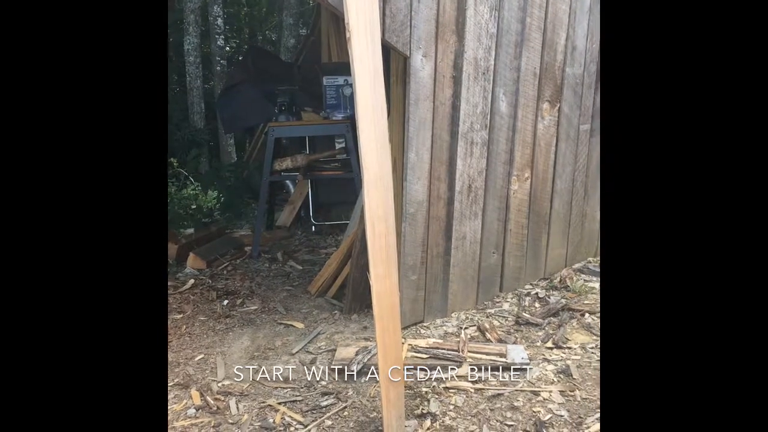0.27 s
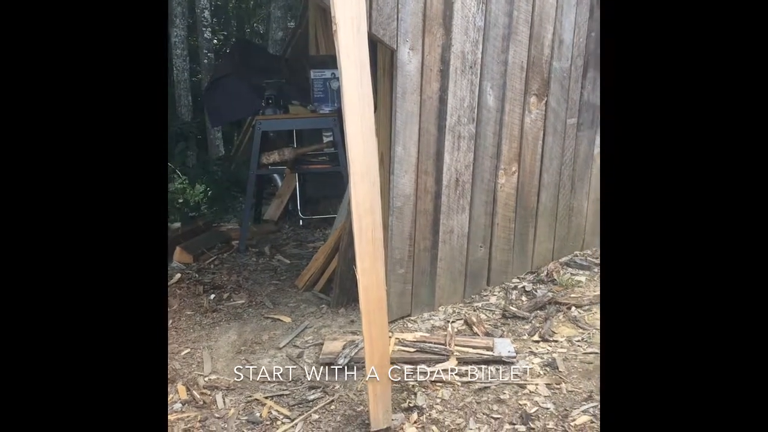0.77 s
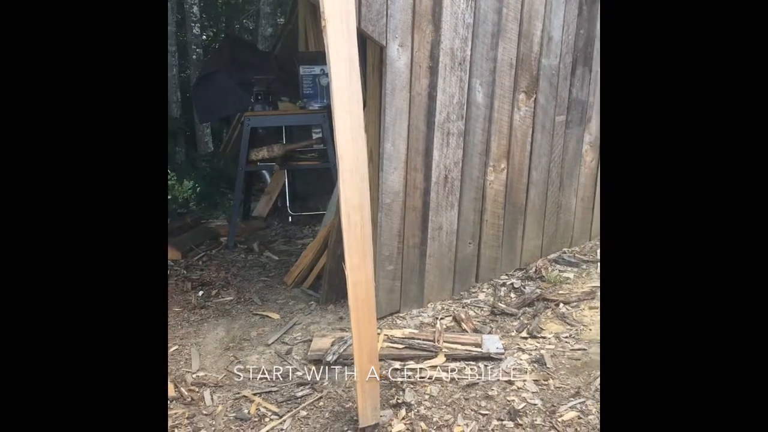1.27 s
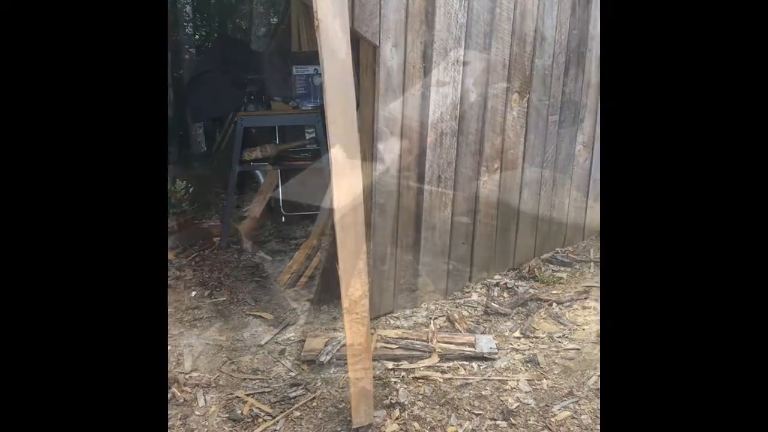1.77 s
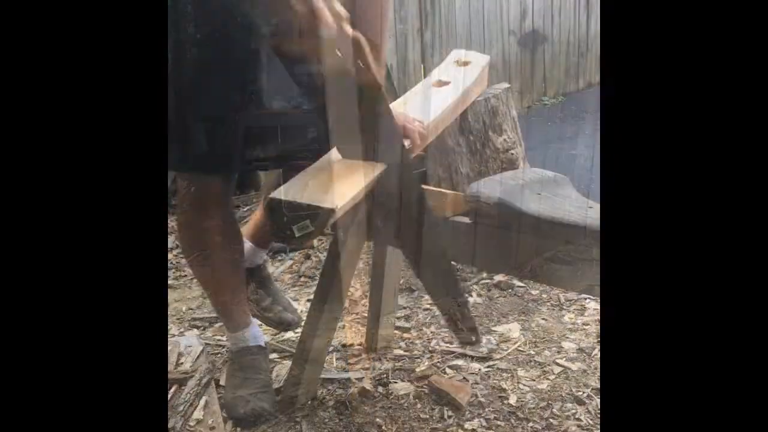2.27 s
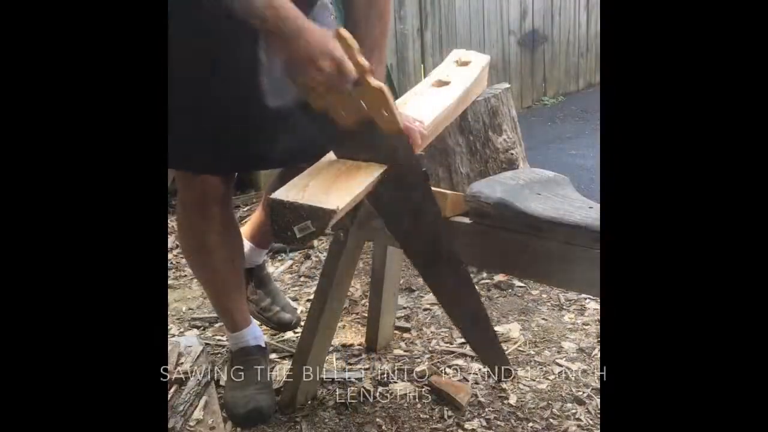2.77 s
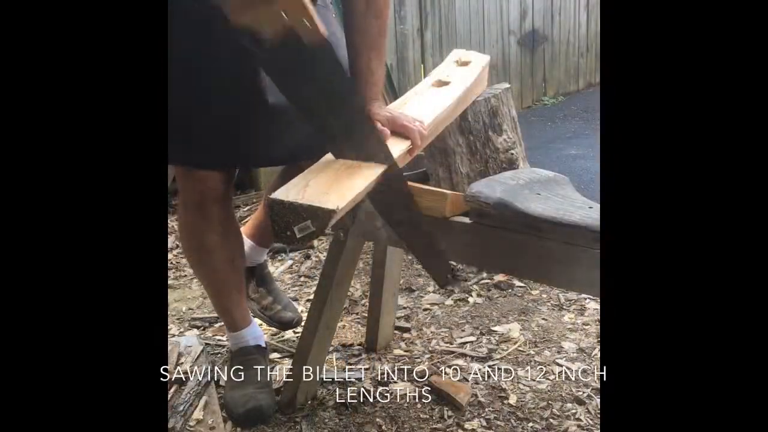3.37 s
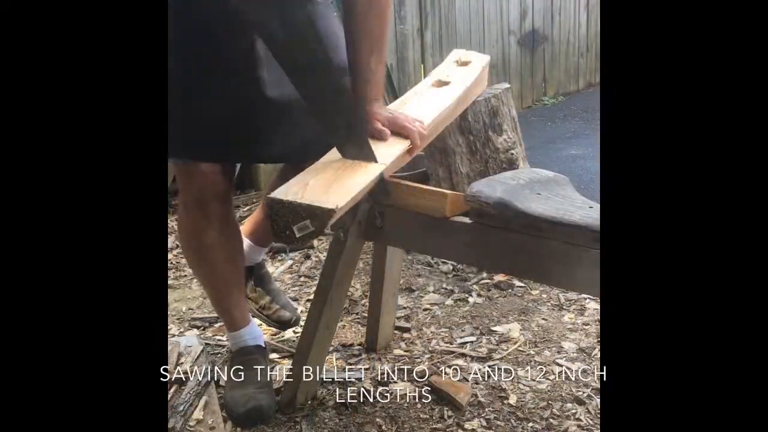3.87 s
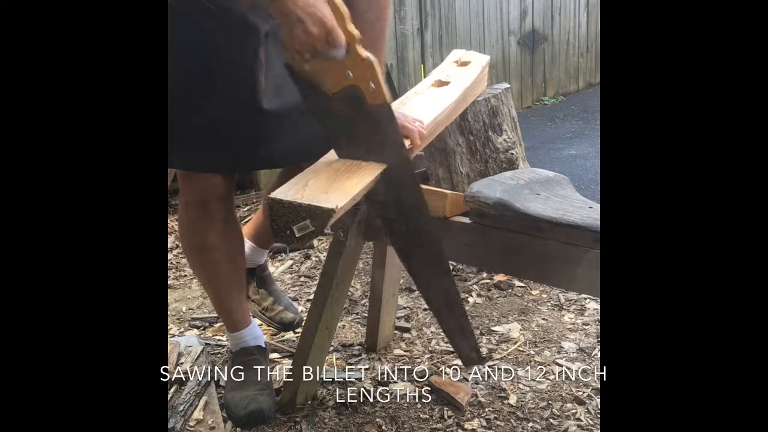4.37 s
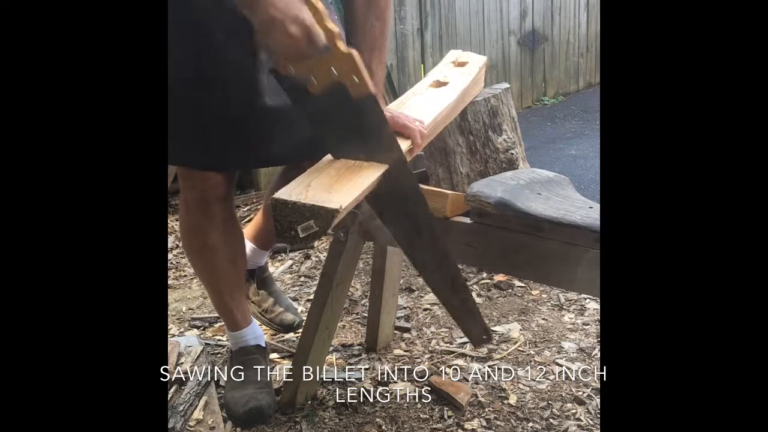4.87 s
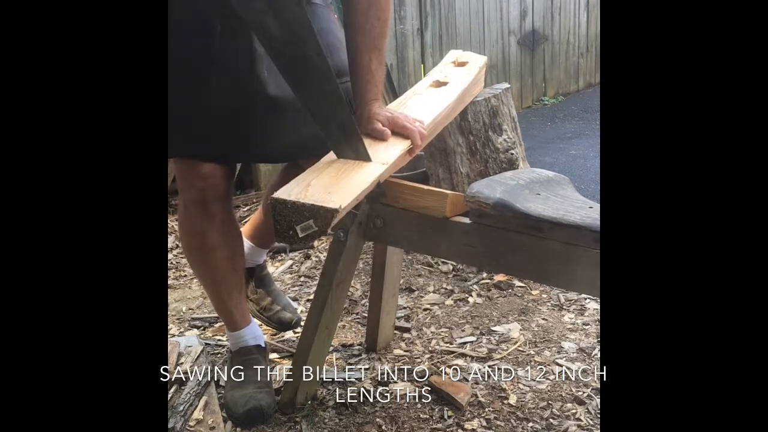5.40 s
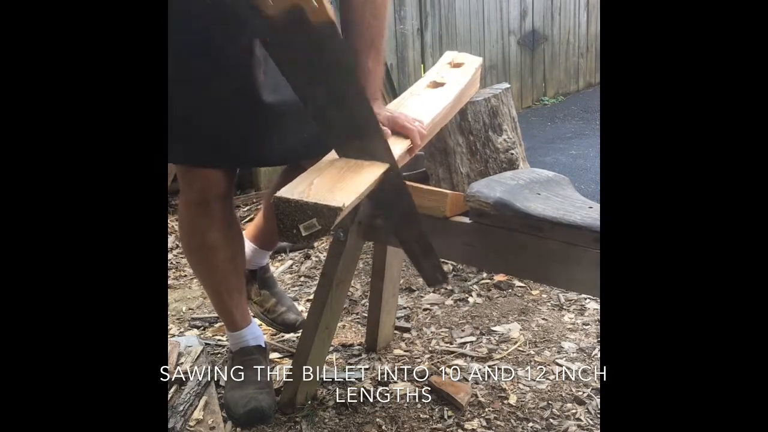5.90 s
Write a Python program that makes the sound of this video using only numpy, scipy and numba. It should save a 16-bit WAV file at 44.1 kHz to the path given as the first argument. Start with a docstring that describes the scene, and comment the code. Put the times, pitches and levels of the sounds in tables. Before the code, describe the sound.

From 0 to 1.4 seconds there is quiet open air with a thin, very high insect trill in fast groups of three, a fainter lower trill, and a few short chips. At about 1.4 a saw blade skims faintly over wood with a small squeak at 1.6. From 1.9 it cuts in earnest, push and pull alternating about every 0.35 seconds, while the insects fade out by 2.6. Each stroke is a grainy, resonant woody rasp under bright steel hiss; pulls often begin with a sharp skid and a falling whoop. Short woody judders catch around 2.7, 3.5, 4.2, 4.85 and 5.6, with high squeaks near 3.0 and 3.9. The blade rings briefly around 2.2, 3.6 and 5.0. Low soft bumps of the sawhorse accompany the strokes. Sawing is strongest around 3.3 to 4.3 and continues to the end at about 6, close, dry and centred.

```python
"""Outdoors by a wooden fence: insects trill and fade as a handsaw starts to crosscut a cedar billet on a sawhorse.
Noisy tooth snaps and tearing fibres drive the resonances of billet, sawhorse and steel, push and pull in turn.
Where the teeth catch, wavering tones judder and noise bands squeak; between some strokes the blade rings on.
Decaying noise makes the faint tail off fence and trees, shaped noise the air.
One close microphone, the same in both channels."""
import sys
import numpy as np
from scipy import signal
from scipy.fft import rfft, irfft
from scipy.io import wavfile
from scipy.ndimage import uniform_filter1d
from numba import njit

SR = 44100
rng = np.random.default_rng(int(sys.argv[2]) if len(sys.argv) > 2 else 0)


def waveform_to_disk(signal):
    """Save audio, clipped to [-1, 1], as 16-bit WAV at the path in sys.argv[1]."""
    frames = np.transpose(np.atleast_2d(signal))
    scaled = np.clip(frames, -1, 1) * 32767
    samples = np.round(scaled).astype(np.int16)
    wavfile.write(sys.argv[1], SR, samples)


N = 270774
T = np.arange(N) / SR

# Saw strokes, push and pull in turn. Each row: start, length, attack and release in seconds,
# basic level of the teeth's hiss in dB, basic level of the wood in dB.
STROKES = [(1.398, 0.345, 0.23, 0.13, -39.5, -58), (1.599, 0.32, 0.085, 0.056, -50.5, -44),
           (1.907, 0.32, 0.115, 0.094, -33, -33.5), (2.245, 0.38, 0.055, 0.16, -34.0, -30),
           (2.611, 0.43, 0.1, 0.19, -27.0, -29.5), (2.945, 0.39, 0.058, 0.15, -32.0, -30),
           (3.319, 0.34, 0.12, 0.093, -26, -26), (3.672, 0.35, 0.037, 0.081, -32.0, -28.5),
           (4.022, 0.303, 0.16, 0.056, -24, -24.0), (4.352, 0.37, 0.042, 0.159, -32.5, -29),
           (4.701, 0.35, 0.13, 0.075, -28.5, -27.5), (5.091, 0.359, 0.055, 0.13, -33.0, -29.5),
           (5.435, 0.33, 0.13, 0.081, -27.5, -27.5), (5.82, 0.36, 0.033, 0.18, -32.5, -27.5)]
# Bending modes of the blade. Each row: frequency in Hz, relative level in dB, 60 dB decay time in seconds.
BLADE = [(353.7, 8.5, 0.95), (489, 10.5, 0.6), (602, 6, 0.76), (860, 3, 0.57), (1030, 9.5, 0.26),
         (1140, 3.5, 0.69), (1180, -5, 0.48)]
# Thud of the sawhorse. Each row: frequency in Hz, relative level in dB.
SAWHORSE = [(25, -44), (65, 0.5), (110, -8), (150, 3), (180, 4), (205, 7), (240, 2), (290, -6.5),
            (500, -38)]


def undb(db):
    """Decibels to gain."""
    return 10 ** (np.asarray(db) / 20)


def unit(x):
    """Scale to rms 1."""
    return x / np.sqrt(np.mean(x ** 2) + 1e-18)


def walk(rate):
    """Smooth random wander with spread 1, about `rate` new values a second."""
    hold = max(int(SR / rate), 1)
    steps = np.repeat(rng.standard_normal(N // hold + 1), hold)
    return unit(uniform_filter1d(steps, hold)[:N])


def colour(x, points):
    """Shape a sound's spectrum by (Hz, dB) points; rms 1."""
    hz, db = np.transpose(points)
    bins = np.fft.rfftfreq(N, 1 / SR)
    gain = undb(np.interp(np.log(bins + 1), np.log(hz), db))
    return unit(irfft(rfft(x) * gain, N))


@njit
def svf(x, hz, width):
    """State-variable band-pass whose centre may move, gain 1 at the centre."""
    y, band, low = np.empty(len(x)), 0., 0.
    for i in range(len(x)):
        g, damping = np.tan(np.pi * hz[i] / SR), width / hz[i]
        v = (band + g * (x[i] - low)) / (1 + g * (g + damping))
        band, low, y[i] = 2 * v - band, low + 2 * g * v, damping * v
    return y


def resonate(x, hz, width):
    """One resonance, fixed or moving; centre and width in Hz."""
    centre = np.clip(hz + np.zeros(len(x)), 20, .45 * SR)
    return svf(x + 1e-18, centre, float(width))


def add(track, start, sound):
    """Mix a short sound in at a time in seconds."""
    first = min(max(int(start * SR), 0), N)
    track[first:first + len(sound)] += sound[:N - first]


def outdoor_air(level_db=-56):
    """Shaped noise whose level wanders slowly, the open air around the microphone."""
    # Each row: frequency in Hz, relative level in dB.
    air_bands = [(20, -19), (45, -8), (70, 5), (100, -3.5), (130, -1), (200, -7.5), (400, -16), (1200, -25),
                 (3000, -22), (5500, -23), (7500, -16), (10300, -31), (13500, -26), (16000, -22)]
    return undb(level_db + 1.0 * walk(4.45)) * colour(rng.standard_normal(N), air_bands)


def yard(x, db=-21, t60_low=0.17, t60_high=0.12, split_hz=4000, first_s=0.022):
    """Fence and trees scatter a faint tail whose treble dies first."""
    t = T[:SR * 3 // 4]
    noise = rng.standard_normal(len(t)) * (t > first_s)
    low = signal.sosfilt(signal.butter(2, split_hz, fs=SR, output="sos"), noise)
    low_tail = low * np.exp(-np.log(1000) * t / t60_low)
    high_tail = (noise - low) * np.exp(-np.log(1000) * t / t60_high)
    tail = low_tail + high_tail
    return undb(db) * signal.fftconvolve(x, tail / np.sqrt(np.sum(tail ** 2)))[:N]


def wing_stroke(start_hz, end_hz, length, rough=.1):
    """A file drawn over a small resonator: a quick rise, a gliding rough note, a fade."""
    t = T[:int(3 * length * SR)]
    hz = end_hz + (start_hz - end_hz) * np.exp(-2 * t / length)
    turns = np.cumsum(hz * (1 + rough * rng.standard_normal(len(t)))) / SR
    rise = 1 - np.exp(-t / .0006)
    return np.sin(2 * np.pi * turns) * rise * np.exp(-(t / length) ** 3)


def insects(first_s=0.025, group_s=.0668, beat_s=.0246, far_db=-13, far_beat_s=0.017):
    """A bush cricket strokes its wings in threes, a fainter one trills lower; a few chips sound nearby."""
    # Loudness of both trills. Each row: time in seconds, level in dB.
    trill_level = [(0, -42), (1.4, -43), (1.9, -44.5), (2.3, -54), (2.6, -75)]
    # Short high chips from the undergrowth. Each row: start in seconds, level in dB.
    chip_calls = [(0.033, -44.5), (.062, -56), (.2465, -50), (.4494, -53), (.667, -56), (.887, -61)]
    trill, chips = np.zeros((2, N))
    end_s = trill_level[-1][0]
    for group in first_s + group_s * np.arange(-1, end_s / group_s):
        for beat in range(3):
            s = group + beat * beat_s + 0.0015 * rng.standard_normal()
            tune = 1 + 0.0026 * rng.standard_normal()
            if s > 0:
                stroke = wing_stroke(start_hz=8100 * tune, end_hz=7540 * tune, length=0.0049, rough=0.024)
                add(trill, s, undb(0.91 * rng.standard_normal()) * stroke)
    for s in np.arange(0, end_s, far_beat_s):
        far_stroke = wing_stroke(start_hz=7100, end_hz=6600, length=0.0057, rough=0.066)
        far_gain = undb(far_db + 1.6 * rng.standard_normal())
        add(trill, s + 0.0073 * rng.standard_normal(), far_gain * far_stroke)
    for s, db in chip_calls:
        add(chips, s, undb(db) * wing_stroke(start_hz=5180, end_hz=5260, length=0.0063, rough=0.12))
    return trill * undb(np.interp(T, *np.transpose(trill_level))) + chips


def bumps(rise_s=0.015, brake_share=0.677, push_rock_db=-17, pull_rock_db=-17.0):
    """The billet rocks as each stroke brakes, and jumps in hard pushes: soft rattling shoves on the sawhorse."""
    # The jumps. Each row: start in seconds, level in dB.
    jolts = [(3.41, -36), (5.65, -37)]
    shove, t = np.zeros(N), T[:SR // 4]
    rocks = []
    for k, (s, length, _, release, _, wood_db) in enumerate(STROKES):
        rock_db = pull_rock_db if k % 2 else push_rock_db
        rocks.append((s + length - brake_share * release, wood_db + rock_db))
    for s, db in rocks + list(jolts):
        add(shove, s, undb(db) * t / rise_s * np.exp(1 - t / rise_s))
    return shove * colour(rng.standard_normal(N), SAWHORSE)


def twangs(spread_octaves=0.31, rise_s=0.004):
    """The blade, let go at the end of a push, rings in its bending modes as decaying sines."""
    # Each row: start in seconds, level in dB, frequency shaken most in Hz.
    releases = [(2.16, -43, 1106), (3.59, -48, 1000), (5.0, -45.5, 604)]
    out, t = np.zeros(N), T[:SR // 2]
    onset = 1 - np.exp(-t / rise_s)
    for start, db, centre in releases:
        for hz, mode_db, t60 in BLADE:
            share = np.exp(-(np.log2(hz / centre) / spread_octaves) ** 2)
            tone = np.sin(2 * np.pi * (hz * t + rng.random())) * np.exp(-np.log(1000) * t / t60)
            add(out, start, undb(db + mode_db) * share * tone * onset)
    return out


def catches(waver=0.026):
    """Stick and slip: the wood judders on nearly one note, the steel squeaks in a high band."""
    # Judders of the wood; the row at 3.727 s is a brief tone within that pull's falling whoop. Each row: middle
    # in seconds, half length in seconds, frequency in Hz, level in dB.
    judders = [(1.844, 0.041, 727, -38.5), (2.727, 0.02, 719, -21.5), (3.175, 0.017, 723, -26),
               (3.487, .02, 742, -22), (3.529, 0.032, 727.7, -18), (3.727, 0.017, 940, -26),
               (3.875, 0.022, 696.5, -26.5), (4.165, .025, 807, -23), (4.849, 0.049, 714, -17),
               (5.582, .03, 722, -22.5), (5.655, .05, 710.7, -23.5)]
    # Skids of the steel in the kerf. Each row: middle in seconds, half length in seconds,
    # frequency in Hz, width in Hz, level in dB.
    squeaks = [(1.5, .15, 15300, 700, -53), (1.591, 0.044, 5170, 5000, -41), (1.59, 0.15, 11360, 600, -50),
               (2.83, .08, 13000, 1180, -39), (2.91, 0.098, 11400, 900, -38.5),
               (3.002, 0.016, 8900, 1188, -36), (3.03, 0.026, 12800, 2400, -24.5),
               (3.728, 0.018, 8290, 1500, -31), (3.872, 0.021, 12000, 4000, -28),
               (3.934, 0.025, 13860, 3500, -27), (4.432, .012, 13950, 2999, -31)]
    out, wander = np.zeros(N), 1 + waver * walk(300)
    for s, half_s, hz, db in judders:
        hump = np.hanning(int(2 * half_s * SR)) ** 2
        turns = np.cumsum(hz * wander[int(s * SR):][:len(hump)]) / SR
        add(out, s - half_s, undb(db) * hump * np.sin(2 * np.pi * turns))
    for s, half_s, hz, width, db in squeaks:
        hump = np.hanning(int(2 * half_s * SR)) ** 2
        band = resonate(resonate(rng.standard_normal(len(hump)), hz, width), hz, width)
        add(out, s - half_s, undb(db) * hump * unit(band))
    return out


def swell(t, length, attack, release, shape, attack_curve=1.5, release_curve=1.35):
    """Level of one stroke in dB: attack, an arched hold that tilts, release."""
    depth_db, sag_db, tilt_db = shape
    attack_ramp = np.maximum(1 - t / attack, 0) ** attack_curve
    release_ramp = np.maximum(1 - (length - t) / release, 0) ** release_curve
    off_centre = np.clip(t / length, 0, 1) - .5
    arch = tilt_db * off_centre - sag_db * (2 * off_centre) ** 2
    return arch - depth_db * (attack_ramp + release_ramp)


def arm(rest_hiss_db=-70, rest_wood_db=-57, uneven_db=1.0, wood_lag_s=0.0058,
        jerk_s=.048, snatch_db=7, snatch_s=0.027, turn_db=-3.5, turn_s=.012):
    """The arm's motion per sample: hiss gain, wood gain, progress 0-1 through the stroke, 1 while pushing."""
    # How level follows a stroke, a push then a pull. Each row: depth of attack and release in dB,
    # sag at both ends in dB, change over the stroke in dB.
    hiss_shape = [(23.91, 11, -11), (23.33, 8.5, -1.13)]
    wood_shape = [(36.4, 0.92, -15.5), (31.8, 8.1, 10.5)]
    hiss, wood, progress, push, turns = np.zeros((5, N))
    for k, (s, length, attack, release, hiss_db, wood_db) in enumerate(STROKES):
        now, pulling = np.abs(T - s - length / 2) < length, k % 2
        t = T[now] - s
        # in a jerked stroke the teeth break loose halfway up the attack and skid brightly
        jerked = (attack < jerk_s) * (t > attack / 2)
        skid_db = jerked * snatch_db * np.exp(-np.abs(t - attack / 2) / snatch_s)
        skim = undb(hiss_db + skid_db + swell(t, length, attack, release, hiss_shape[pulling]))
        # the teeth skim before they bite
        bite = undb(wood_db + swell(t - wood_lag_s, length, attack, release, wood_shape[pulling]))
        # the blade stands still for an instant before each push
        turns[now] += (1 - pulling) * np.exp(-(t / turn_s) ** 2)
        # each stroke takes over where it outgrows the ones before
        leads = skim > hiss[now]
        progress[now] = np.where(leads, np.clip(t / length, 0, 1), progress[now])
        push[now] = np.where(leads, 1 - pulling, push[now])
        hiss[now], wood[now] = np.hypot(hiss[now], skim), np.hypot(wood[now], bite)
    # from the first full stroke on, the blade keeps rubbing faintly between strokes
    in_kerf = T > STROKES[2][0]
    hiss = np.hypot(hiss, in_kerf * undb(rest_hiss_db))
    wood = np.hypot(wood, in_kerf * undb(rest_wood_db))
    pressure = undb(turn_db * turns + uneven_db * walk(45))
    return hiss * pressure, wood * pressure, progress, uniform_filter1d(push, size=200)


def teeth(speed, top_hz=620, jitter=.12, bite_db=3, tear=0.9, rub=1.0, snap=0.23):
    """Each tooth snaps into the wood with its own bite, then tears fibres until the next arrives."""
    passed = np.cumsum(top_hz * speed * (1 + jitter * walk(250))) / SR
    tooth = np.abs(passed).astype(int)
    bite = undb(bite_db * rng.standard_normal(N))[tooth]
    snaps = np.diff(tooth, prepend=0) * bite
    tearing = (rub + bite * np.exp(-(passed % 1) / tear)) * rng.standard_normal(N)
    return unit(unit(tearing) + snap * unit(snaps))


def along_blade(x, place, near_s=0.001208, travel_s=.0035, echo=0.21):
    """Waves return from the end of the blade; the delay follows the place of the cut, so the ripples sweep."""
    delay_s = near_s + travel_s * place
    return unit(x + echo * np.interp(T - delay_s, T, x))


def ring(load, patchy_db=4.0, drift=0.0054):
    """The billet's modes swell, fade and drift a little as the cut and the grip shift."""
    # Resonances of the billet. Each row: frequency in Hz, width in Hz, relative level in dB.
    billet_modes = [(400.6, 26, -12), (459.5, 38, -6.5), (646, 13, -2), (704, 25, -1.5), (750, 71, 4),
                    (967, 75, -0.5), (1080, 11, 4.5), (1227, 33, -0.5), (1484, 83, 3.5), (1722, 210, -3.5),
                    (1990, 70, -19), (2800, 120, -9), (3415, 25, -5.5)]
    # A narrow billet radiates little bass. Each row: frequency in Hz, relative level in dB.
    radiation = [(150, -14), (290, -4.5), (370, 2), (700, 1.5), (2000, -2), (5000, -3), (9000, -13)]
    total = np.zeros(N)
    for hz, width, db in billet_modes:
        total += undb(db + patchy_db * walk(14)) * resonate(load, hz * (1 + drift * walk(5)), width)
    return colour(total, radiation)


def lock(load, hz=717, width=22, drive=7.2):
    """Under pressure the teeth slip in time with the billet's main mode, which holds a nearly steady strength."""
    limited = np.tanh(drive * unit(resonate(load, hz, width)))
    return unit(resonate(resonate(limited, hz, 8 * width), hz, 8 * width))


def steel(x):
    """The blade's high modes stand out of the hiss."""
    # Each row: frequency in Hz, width in Hz, relative level in dB.
    high_modes = [(5660, 90, -9), (6365, 110, 0), (6830, 34, 0), (8678, 100, -5), (9442, 39, -1),
                  (12440, 110, -14), (12948, 35, -9), (14010, 60, -10)]
    return unit(x + sum(undb(db) * resonate(x, hz, width) for hz, width, db in high_modes))


def flex(load, last_hz=495, fall=0.284, width=50, second=1.6, second_db=-8, third=4.1, third_db=-9):
    """On the pull the free steel between hand and kerf lengthens, so its three notes fall."""
    # Whoops early in a pull. Each row: start in seconds, length in seconds, first frequency in Hz, level in dB.
    whoops = [(2.278, 0.086, 940, -36.5), (3.012, 0.107, 837, -39), (3.715, 0.078, 1173, -33),
              (4.38, 0.126, 1000, -39), (5.861, 0.18, 853, -35)]
    hz, gain = np.full(N, float(last_hz)), np.zeros(N)
    for s, length, first_hz, db in whoops:
        now = (T >= s) & (T < s + length)
        part = (T[now] - s) / length
        hz[now] = last_hz + (first_hz - last_hz) * np.exp(-part / fall)
        gain[now] = undb(db) * np.sin(np.pi * part)
    notes = (hz, second * hz, third * hz)
    low, middle, high = (unit(resonate(resonate(load, f, width), f, 3 * width)) for f in notes)
    return gain * (low + undb(second_db) * middle + undb(third_db) * high)


def blade_hum(drive, db=1):
    """Cutting keeps the blade's modes faintly alive into the pauses."""
    total = np.zeros(N)
    for hz, mode_db, t60 in BLADE:
        width = np.log(1000) / np.pi / t60
        total += undb(mode_db) * resonate(drive, hz, width)
    return undb(db) * total


def saw(push_ring_db=-0.5, pull_ring_db=-3.5, push_rasp_db=-5.0, pull_rasp_db=-3,
        push_lock_db=-7, pull_lock_db=-16, push_thud_db=-17, pull_thud_db=-26,
        lean_db=7, hiss_db=2.5, grain_db=1.0):
    """Tooth impacts drive the billet, the sawhorse and the steel."""
    # Broad rasp of tearing fibres. Each row: frequency in Hz, relative level in dB.
    rasp_bands = [(290, -27), (420, 1), (700, -3.5), (870, -3), (1000, 5.5), (1300, -1.5), (1750, 0.5),
                  (2400, -3.5), (3500, -6), (4600, -17.5), (7000, -20.5)]
    # Hiss of the steel teeth. Each row: frequency in Hz, relative level in dB.
    hiss_bands = [(1500, -15.5), (2400, -3.5), (3400, 0.5), (4900, -5), (5700, -1.5), (7000, -3),
                  (8000, -4.5), (9500, -2.5), (10500, -2.5), (12300, 1.5), (14000, 0), (16000, 0)]
    hiss, wood, progress, push = arm()
    pull = 1 - push
    speed = .25 + .75 * np.sin(np.pi * progress)
    travel = (1 - np.cos(np.pi * progress)) / 2
    force = along_blade(teeth(speed), push * travel + pull * (1 - travel))
    # hard and soft growth rings make the load on the wood uneven
    load = force * undb(grain_db * walk(70))
    tearing = along_blade(teeth(speed), travel, near_s=0.001938, travel_s=0.002146, echo=0.65)
    fibres = colour(tearing, rasp_bands)
    body = ring(load) * undb(push * push_ring_db + pull * pull_ring_db)
    body += fibres * undb(push * push_rasp_db + pull * pull_rasp_db)
    body += lock(fibres) * undb(push * push_lock_db + pull * pull_lock_db)
    # the arm leans harder on the sawhorse as the stroke goes on
    thud_db = push * push_thud_db + pull * pull_thud_db + lean_db * (progress - 1.0)
    body += colour(load, SAWHORSE) * undb(thud_db)
    teeth_hiss = hiss * undb(hiss_db) * colour(steel(force), hiss_bands)
    return wood * body + teeth_hiss + flex(load) + blade_hum(load * wood)


def scene():
    """Air, insects and saw, all in the centre."""
    air = outdoor_air()
    wildlife = insects()
    work = saw() + twangs() + bumps()
    tails = yard(work, db=-27.0) + yard(wildlife, db=-6)
    mono = air + wildlife + work + catches() + tails
    return np.array([mono, mono])


def record(dry, top_hz=15850):
    """The recorder cuts the top steeply."""
    low_pass = signal.ellip(10, .1, 60, top_hz, fs=SR, output="sos")
    return signal.sosfiltfilt(low_pass, dry)


dry = scene()
out = record(dry)
waveform_to_disk(out)
```